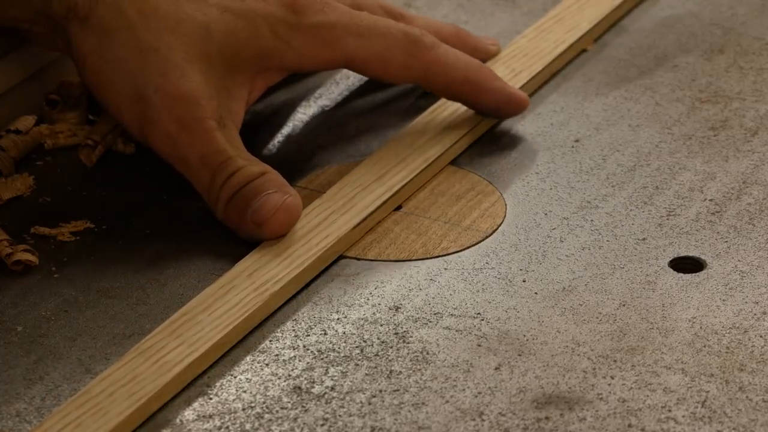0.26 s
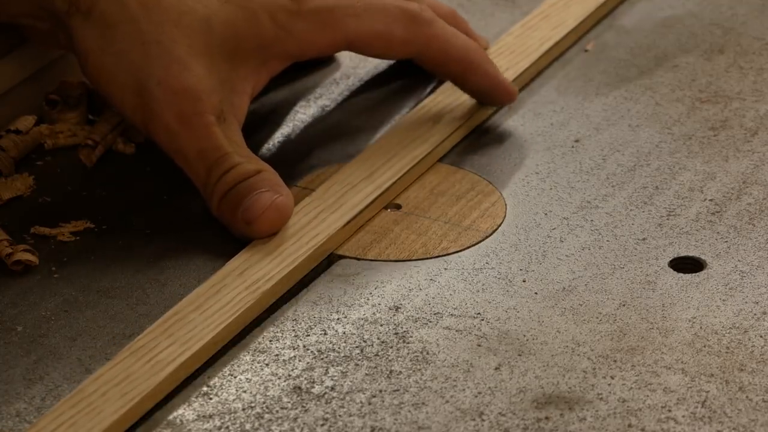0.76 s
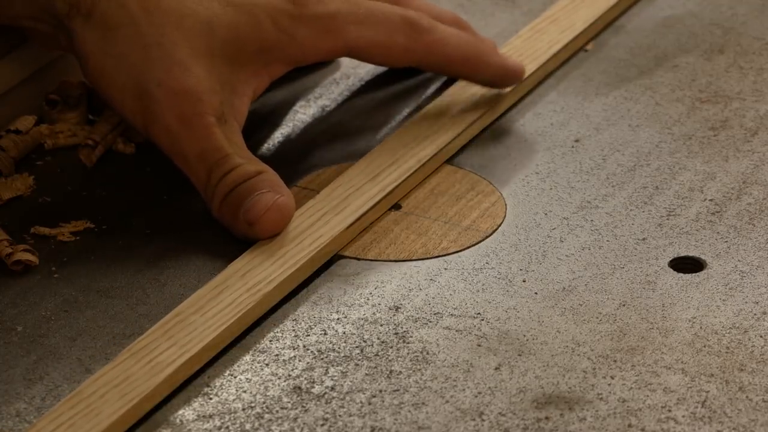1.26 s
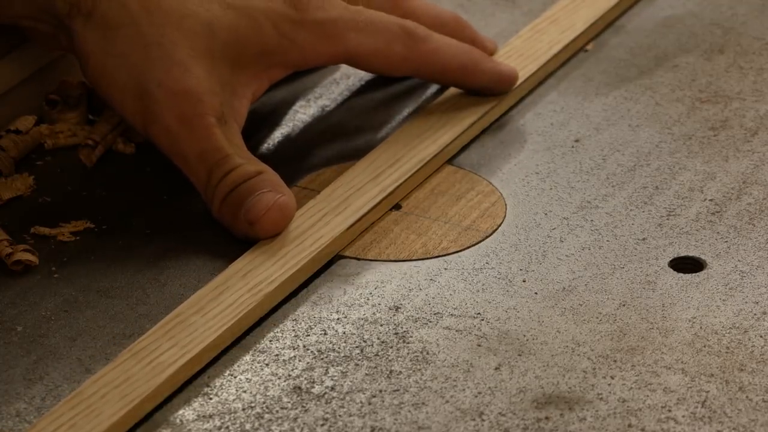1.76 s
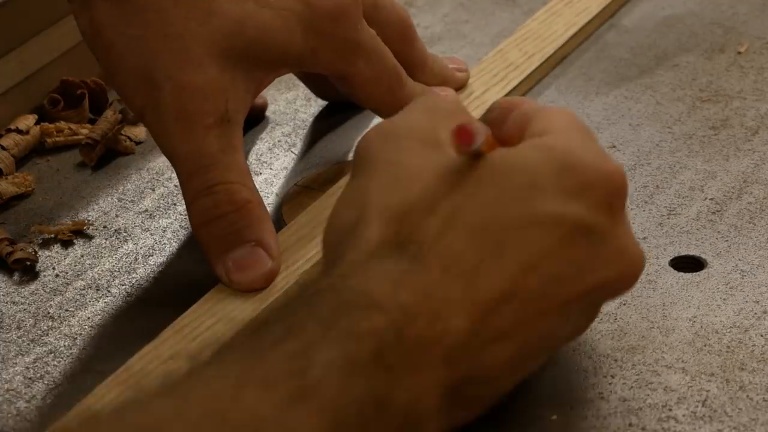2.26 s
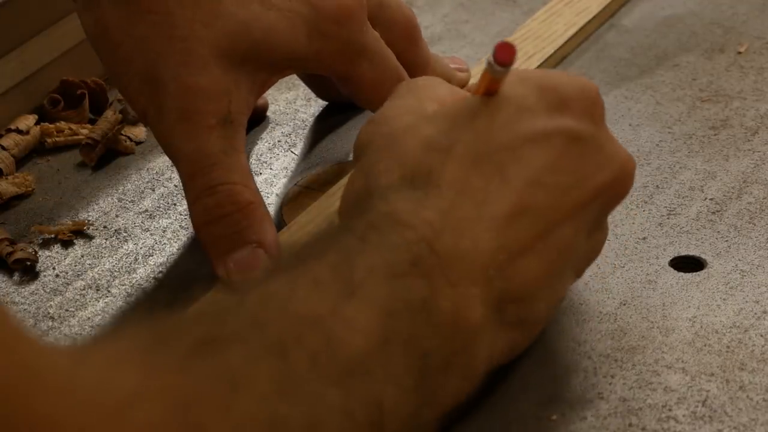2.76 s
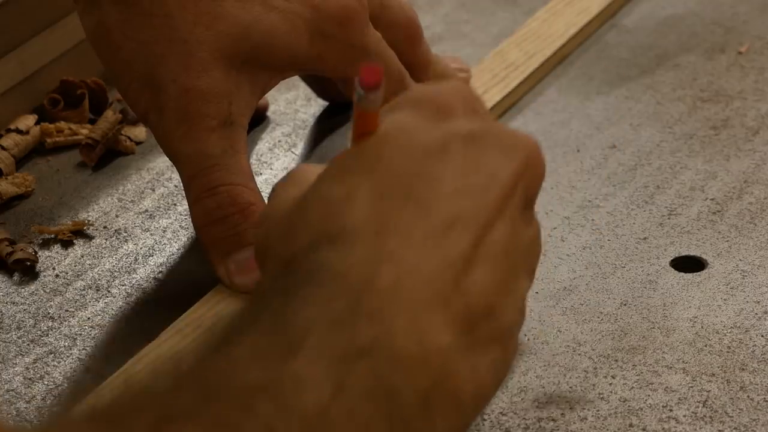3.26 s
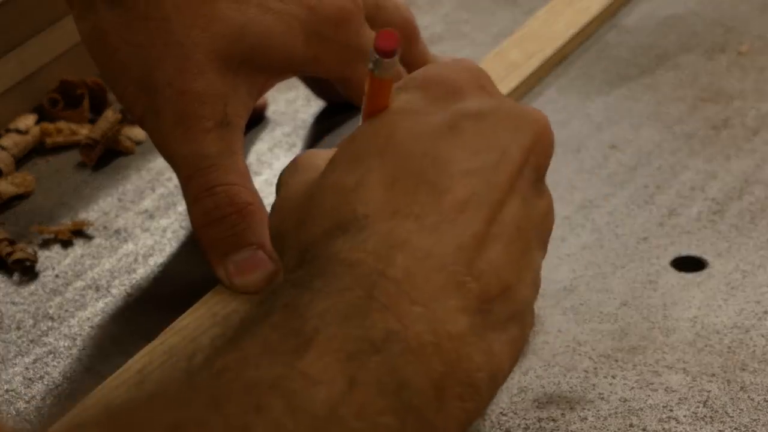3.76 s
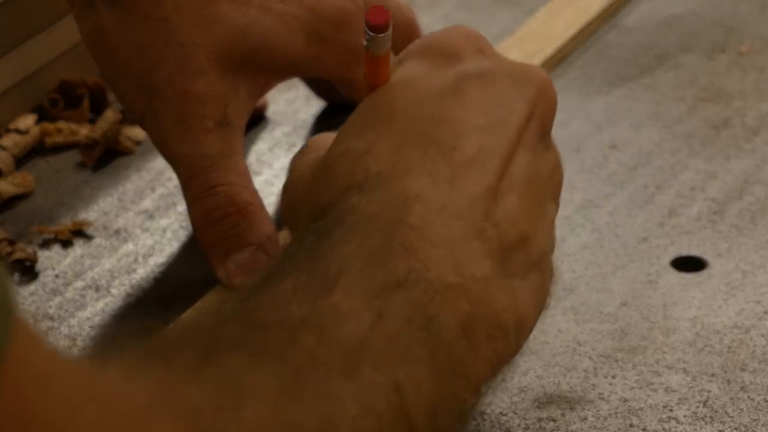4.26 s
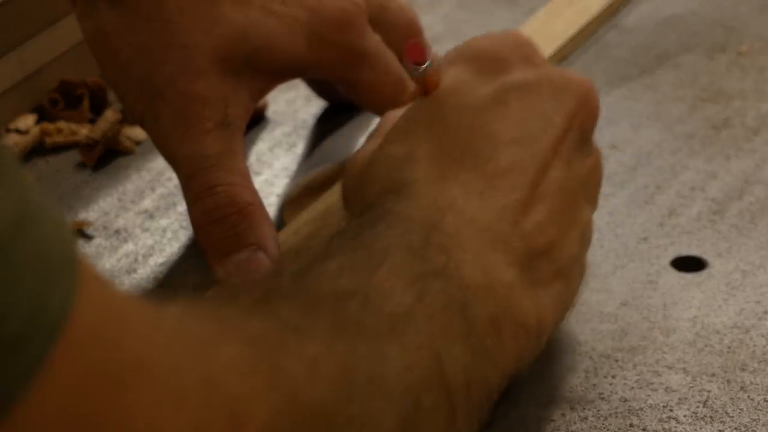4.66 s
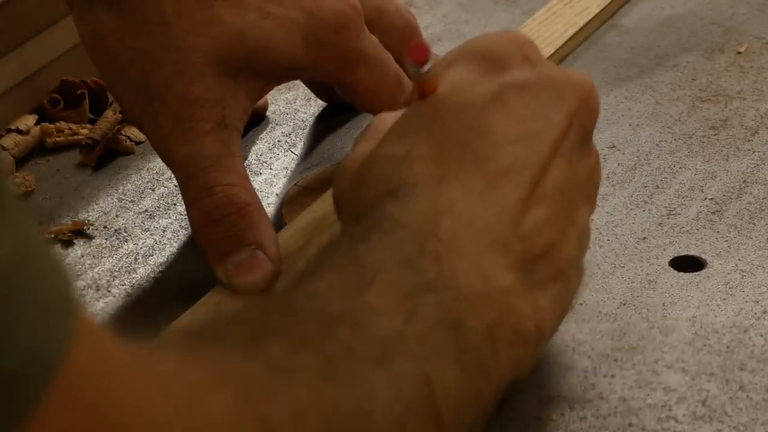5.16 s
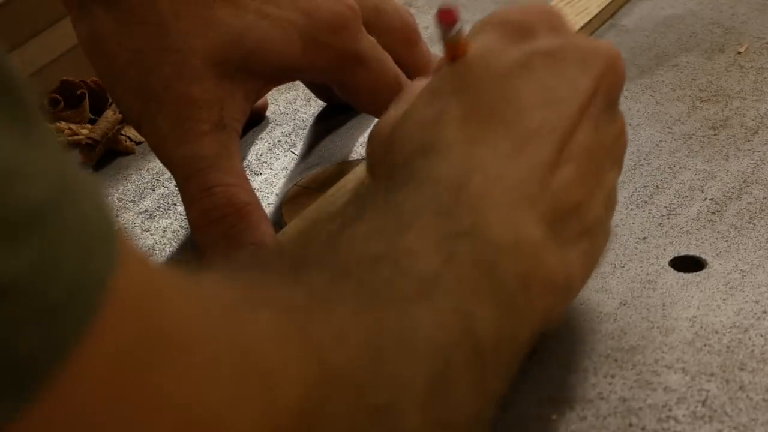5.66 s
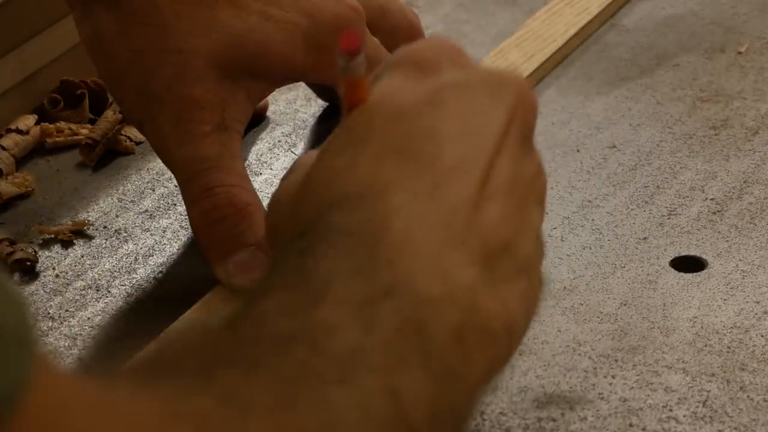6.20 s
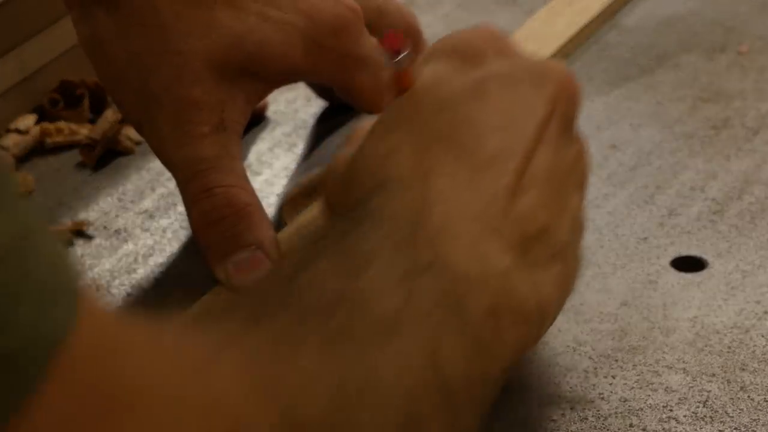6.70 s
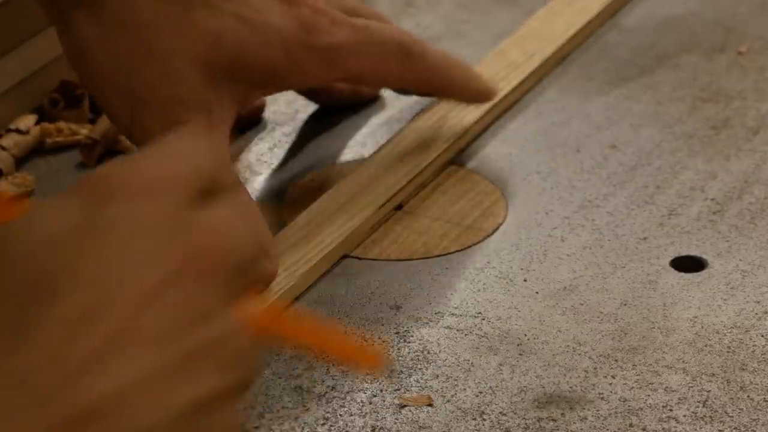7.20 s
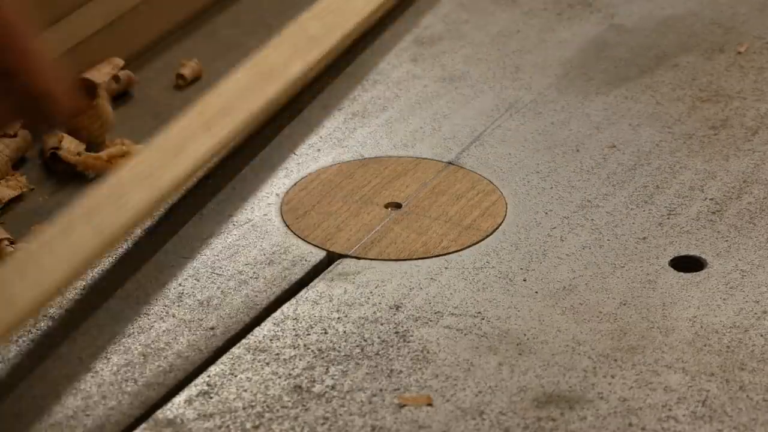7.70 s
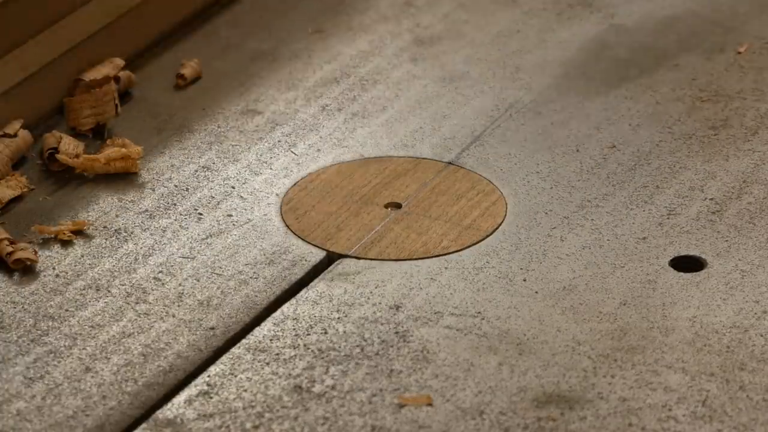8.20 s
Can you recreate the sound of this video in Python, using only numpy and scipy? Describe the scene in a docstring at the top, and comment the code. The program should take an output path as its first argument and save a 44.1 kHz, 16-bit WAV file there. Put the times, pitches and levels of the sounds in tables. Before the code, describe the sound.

Soft room noise fills a small workshop, with faint birds chirping outside for the first two and a half seconds. Around 0.5 to 1.3 seconds a wooden strip slides lightly on a cast-iron table. A very faint low hum comes and goes from about 2 seconds. Close to the microphone, a hand settles with a light clatter near 2.8 seconds, and a pencil gives a sharp snap on the wood at 3.3. From about 3.6 to 7 seconds the pencil scratches to and fro in quick, soft strokes, with irregular ticks that ring the iron slightly and tiny squeaks towards the end. A second snap, the loudest sound, comes at 7 seconds. The strip slides off with a short rasp at 7.4 and knocks on the table at 7.6. Light rustling, a few distant chirps and a brief scuff at 8.3 follow.

```python
"""A pencil is worked to and fro along a wooden strip on a cast-iron machine table, close to the microphone.
Its lead is noise grains and micro-slips; ticks and two sharp snaps are impulses ringing pencil, wood and iron.
The hand settles with a light clatter; at the end the strip slides off, a rasp with ringing modes, and knocks.
A small workshop rings behind it as decaying noise, over soft room noise, a low hum tone, faint far tones
and birdsong from outside, made of gliding sine whistles."""
import sys
import numpy as np
from scipy import signal
from scipy.fft import rfft, irfft
from scipy.io import wavfile
from scipy.ndimage import map_coordinates

SR = 44100
rng = np.random.default_rng(int(sys.argv[2]) if len(sys.argv) > 2 else 0)


def dump_mix(stems):
    """Bounce the given channels to the path in sys.argv[1] as a 16-bit WAV at rate SR."""
    frames = np.atleast_2d(stems).T  # one column per channel
    limited = np.clip(frames, -1, 1)  # hard clip at full scale
    pcm = np.round(limited * 32767).astype(np.int16)
    wavfile.write(sys.argv[1], SR, pcm)


N = 372204
TIME = np.arange(N) / SR  # seconds
RING_SIZE = 2 ** 14  # samples in every frequency response
RING_HZ = np.maximum(np.arange(RING_SIZE // 2 + 1) * SR / RING_SIZE, 1)

# Modes of the hand-held pencil. Each row: centre in Hz, width in Hz, relative level in dB.
PENCIL_MODES = [(800, 830, -15), (1545, 310, -15), (1966, 280, 2), (2138, 75, 8.5), (3500, 330, -11),
                (5060, 720, -10.5), (6500, 2000, -13)]
# Bending modes of the wooden strip. Each row: centre in Hz, width in Hz, relative level in dB.
STRIP_MODES = [(338, 9.1, 17), (697, 13.6, -5), (1018, 14, -6), (1404, 22, -8), (1819, 20.7, 0),
               (2270, 26, -14.5), (3440, 84, -14), (3790, 73, -17)]


def undb(db):
    """Decibels to gain."""
    return 10 ** (np.asarray(db) / 20)


def unit(x):
    """Scale to an rms of one."""
    return x / np.sqrt(np.mean(x ** 2))


def add(track, start, sound):
    """Mix a sound into a track at a time in seconds, cutting what falls outside."""
    i = int(round(start * SR))
    i, sound = max(i, 0), sound[max(-i, 0):]
    track[i:i + len(sound)] += sound[:len(track) - i]


def colour(points):
    """Causal, minimum-phase frequency response through (Hz, dB) points."""
    hz, db = np.transpose(points)
    gain = undb(np.interp(np.log(RING_HZ), np.log(hz), db))
    # folding the cepstrum forward in time makes the response causal
    cepstrum = irfft(np.log(gain))
    cepstrum[1:RING_SIZE // 2] *= 2
    cepstrum[RING_SIZE // 2 + 1:] = 0
    return np.exp(rfft(cepstrum))


def resonance(hz, width):
    """Frequency response of one damped mode, gain one at its centre."""
    return 1 / (1 + 1j * (RING_HZ ** 2 - hz ** 2) / (RING_HZ * width))


def body(modes):
    """Frequency response of an object: the sum of its modes."""
    return sum(undb(db) * resonance(hz, width) for hz, width, db in modes)


def through(x, response):
    """Pass a sound through a frequency response."""
    return signal.fftconvolve(x, irfft(response)[:RING_SIZE // 2])[:len(x)]


def blow(response, peak_db):
    """The ring of a single impulse, at a given peak level."""
    ring = irfft(response)[:RING_SIZE // 2]
    return ring * undb(peak_db) / np.abs(ring).max()


def walk(rate):
    """Slow chance: random values drawn at a rate per second and joined by straight lines."""
    steps = rng.standard_normal(2 ** 12)
    return np.interp(TIME * rate, np.arange(len(steps)), steps)


def drift(x, share, rate):
    """Let every resonance of a steady sound wander in pitch by a small share."""
    reading_place = np.cumsum(1 + share * walk(rate))
    return map_coordinates(x, [reading_place], order=3, mode="mirror")


def friction(grain_db, flutter_db):
    """Dense micro-slips of unequal size whose strength flutters with the wood grain."""
    grain = grain_db * np.minimum(rng.standard_normal(N), 2)
    flutter = flutter_db * walk(110)
    return unit(rng.standard_normal(N) * undb(grain + flutter))


def grit(per_s, grain_db, clump_db):
    """Sparse tiny clicks of unequal size whose strength swells in clumps."""
    sizes = undb(grain_db * np.minimum(rng.standard_normal(N), 1) + clump_db * walk(25))
    clicks = (rng.random(N) < per_s / SR) * rng.choice([-1, 1], N)
    return unit(clicks * sizes)


def pushes(rows, fullness):
    """Loudness of hand movements: each speeds up from rest and slows down again."""
    out = np.zeros(N)
    for start, end, db in rows:
        along = np.linspace(0, np.pi, max(int((end - start) * SR), 2))
        add(out, start, undb(db) * np.abs(np.sin(along)) ** fullness)
    return out


def crunch(hz=6000, decay_s=0.00091, crunch_db=-2):
    """Graphite crumbles on contact, which spreads the treble of a blow over about a millisecond."""
    t = TIME[:RING_SIZE]
    grains = rng.standard_normal(RING_SIZE) * np.exp(-t / decay_s)
    treble = 1 / (1 + hz / (1j * RING_HZ)) ** 2
    return 1 + undb(crunch_db) * treble * rfft(grains) / np.sqrt(np.sum(grains ** 2))


def air(level_db=-65, side_db=-23):
    """Low rumble and soft hiss of the workshop's still air: coloured noise, nearly mono."""
    # Each row: frequency in Hz, relative density in dB per Hz.
    air_colour = [(15, -37), (25, -1.5), (119, -0.5), (193, -6), (378, -10.5), (560, -7.5), (1020, -19.5),
                  (1490, -23), (4000, -27.5), (7700, -34), (11500, -34), (15500, -42.5)]
    mid, side = (unit(through(rng.standard_normal(N), colour(air_colour))) for _ in range(2))
    return undb(level_db) * (mid + undb(side_db) * side * np.array([[1], [-1]]))


def hum(hz=162.2, waver_hz=0.88, attack_s=0.068, sag_db_per_s=3.5, t60_s=4.9):
    """One low tone that wavers slightly; each time it sets in quickly, sags and dies away."""
    # Each row: start in seconds, start of the dying away in seconds, level in dB.
    hum_spells = [(1.903, 3.3, -63.5), (3.804, 4.9, -65.5), (6.777, 8.4, -71)]
    phase = 2 * np.pi * np.cumsum(hz + waver_hz * walk(6)) / SR
    level = np.zeros(N)
    for start, end, db in hum_spells:
        fade_db = sag_db_per_s * TIME + 60 * np.maximum(TIME - (end - start), 0) / t60_s
        add(level, start, np.minimum(TIME / attack_s, 1) * undb(db - fade_db))
    return unit(np.sin(phase)) * level


def whines(waver_hz=5):
    """Faint, unsteady tones from far off that swell, slide in pitch and fade."""
    # Each row: start in seconds, end in seconds, level in dB, first and last pitch in Hz.
    far_tones = [(1.278, 1.81, -71.5, 553, 551), (2.959, 3.722, -72.5, 757, 657)]
    out = np.zeros(N)
    for start, end, db, first, last in far_tones:
        hz = np.interp(TIME, [start, end], [first, last]) + waver_hz * walk(60)
        tone = np.sin(2 * np.pi * np.cumsum(hz) / SR)
        out += unit(tone * undb(2 * walk(20))) * pushes([(start, end, db)], fullness=0.32)
    return out


def birds(names, trill_hz=88, waver=.005, wander=0.0051):
    """Whistles that glide through three pitches, some with a fast trill; repeats waver each in their own way."""
    # Notes of each syllable. Each row: delay in seconds, length in seconds, first, middle and last pitch
    # in Hz, relative level in dB, trill depth in Hz (a tiny depth only pulses the loudness).
    syllable_notes = { "buzz": [(0, 0.066, 3010, 3063, 3090, 0.5, 164),
                      (.089, 0.033, 3650, 3100, 2700, 1, 0)],
                      "seesaw": [(0, 0.0318, 3415, 3180, 2770, 0, 0.0024),
                      (.064, 0.036, 3154, 3440, 4020, 2, 0)], "sway": [(0, 0.034, 3450, 3120, 2770, 2, 0),
                      (.062, 0.063, 3120, 3520, 3640, -2.5, 0)],
                      "chip": [(0.002, 0.028, 4100, 3800, 4400, -0.5, 0)],
                      "lift": [(0, 0.049, 2750, 3240, 3600, -0.5, 0)],
                      "flourish": [(-.032, 0.039, 2110, 2115, 2070, -3, 0),
                      (.005, 0.041, 2350, 2244, 2290, -0.5, 0), (.096, .02, 2410, 2640, 2800, 3, 0),
                      (.116, .026, 2295, 2050, 1810, 1.5, 0.0045)],
                      "slur": [(0, 0.034, 2150, 2220, 2320, 0, 0)],
                      "thin": [(0.0013, 0.15, 6700, 6220, 5650, 0.5, 80)]}
    # When each syllable sounds. Each row: start in seconds, level in dB before the note's own.
    song_times = { "buzz": [(-.06, -70), (.178, -68.5), (.404, -66.5)], "seesaw": [(.657, -64),
                  (.849, -66.5), (1.654, -68)], "sway": [(1.04, -70), (1.247, -72.5), (1.46, -69.5)],
                  "chip": [(.83, -74), (1.435, -80), (1.635, -72), (7.795, -67)], "lift": [(1.876, -70)],
                  "flourish": [(1.99, -72.5), (2.256, -71.5), (2.589, -72.5)], "slur": [(7.844, -68),
                  (7.988, -66), (8.234, -68)], "thin": [(.24, -81), (.71, -76), (1.24, -78), (1.62, -75.5)]}
    out = np.zeros(N)
    bend = 1 + waver * walk(150) + wander * walk(15)
    for name in names:
        for delay, length, first, middle, last, note_db, trill in syllable_notes[name]:
            t = TIME[:int(length * SR)]
            along = t / t[-1]
            beat = 2 * np.pi * trill_hz * t
            glide = np.polyval(np.polyfit([0, .5, 1], [first, middle, last], 2), along)
            hz = glide + trill * np.sin(beat)
            # a trill sounds on its downward strokes, as a row of tiny notes
            pulses = 1 - (trill > 0) * np.cos(beat)
            swell = np.sqrt(2 * np.abs(np.sin(np.pi * along)) * pulses)
            for start, db in song_times[name]:
                own_bend = bend[int(abs(start) * SR):][:len(t)]
                phase = 2 * np.pi * np.cumsum(hz * own_bend) / SR
                add(out, start + delay, undb(db + note_db) * swell * np.sin(phase))
    return out


def room(x, wet_db, t60=0.41, treble_db=-2, width_db=-19):
    """The diffuse tail of a space as decaying noise, nearly the same left and right."""
    t = TIME[:SR * 3 // 4]
    fade = undb(-60 * t / t60) * (1 - np.exp(-t / 0.00012))
    walls = colour([(4000, 0.0039), (14000, treble_db)])
    energy = np.sqrt(np.sum(fade ** 2))
    tails = [through(rng.standard_normal(len(t)) * fade, walls) / energy for _ in range(2)]
    mid, side = (undb(wet_db) * signal.fftconvolve(x, tail)[:N] for tail in tails)
    return mid + undb(width_db) * side * np.array([[1], [-1]])


def frame_echoes(x):
    """Iron surfaces of the machine's frame throw each click back within milliseconds."""
    # Each row: delay in seconds, level in dB against the click itself.
    frame_delays = [(.0043, -24), (.0058, -12.5)]
    out = x.copy()
    for delay, db in frame_delays:
        add(out, delay, undb(db) * x)
    return out


def arm(hz=95, width_hz=110):
    """A soft, low rumble of the forearm moving in and out over the table: noise through a low mode."""
    # Each row: start in seconds, end in seconds, level in dB.
    arm_reaches = [(1.9, 3.9, -72.5), (6.2, 7.8, -70)]
    rumble = through(rng.standard_normal(N), resonance(hz, width_hz) ** 2)
    return unit(rumble) * pushes(arm_reaches, fullness=.8)


def crackle(hz=4500, width_hz=2300):
    """Soft, dry rustle of things being handled: clumps of tiny clicks through a wide treble mode."""
    # Each row: start in seconds, end in seconds, level in dB.
    crackle_spells = [(7.2, 7.38, -71), (7.66, 7.95, -71.5)]
    grains = grit(per_s=2500, grain_db=4, clump_db=3)
    return unit(through(grains, resonance(hz, width_hz) ** 2)) * pushes(crackle_spells, fullness=0.18)


def scuffs():
    """Bumps and short rough contacts of handling: noise that swells and dies away, with one resonance each."""
    # Each row: start in seconds, level in dB, rise in seconds, t60 in seconds, tilt in dB per octave,
    # resonance in Hz, relative resonance level in dB.
    scuff_rows = [(2.825, -57, 0.0067, 0.42, 2, 1650, -5), (3.363, -50, 0.001, 0.065, -0.5, 1700, 11),
                  (4.622, -54.5, 0.0032, 0.22, -6.5, 1000, 11), (6.273, -49, 0.0031, 0.19, 2, 3900, -28),
                  (7.366, -49.5, 0.0096, 0.26, 1.5, 303, 13), (8.028, -50.5, 0.0067, 0.14, 5.5, 3110, 1),
                  (8.308, -42.5, 0.034, 0.21, 3.5, 3650, -3.5)]
    # Colour before the tilt. Each row: frequency in Hz, level in dB.
    scuff_colour = [(100, -12.5), (300, -2.5), (650, 3.5), (1200, -8), (1800, -2.5), (3900, -7.5),
                    (6500, -19), (15500, -38.5)]
    out, t = np.zeros(N), TIME[:SR // 2]
    for start, db, rise, t60, tilt_db, hz, ring_db in scuff_rows:
        tilted = colour([(f, level + tilt_db * np.log2(f / hz)) for f, level in scuff_colour])
        response = tilted * (1 + undb(ring_db) * resonance(hz, hz / 6))
        grains = unit(through(rng.standard_normal(len(t)), response))
        swell = np.minimum(t / rise, 1) ** .5
        add(out, start, grains * swell * undb(db - 60 * np.maximum(t - rise, 0) / t60))
    return out


def light_contacts(click_hz=5500, click_width_hz=3200):
    """Small hard touches as impulses: some clatter with a brief ring, others are dry clicks."""
    # Hand and pencil settling. Each row: start in seconds, peak in dB.
    clatter_hits = [(2.8255, -55), (2.8335, -43.5), (2.975, -57.5), (6.275, -47)]
    # What the clatter rings with. Each row: centre in Hz, width in Hz, relative level in dB.
    clatter_modes = [(1624, 9.2, 0.5), (3180, 36, -5), (3555, 34, 3), (3820, 27, 3.5)]
    # Lone dry clicks of handling. Each row: start in seconds, peak in dB.
    dry_clicks = [(1.2895, -47.5), (7.7222, -46), (8.0345, -39)]
    clatter = body(clatter_modes)
    click = resonance(click_hz, click_width_hz) ** 2
    out = np.zeros(N)
    for rows, response in ((clatter_hits, clatter), (dry_clicks, click)):
        for start, db in rows:
            add(out, start, blow(response, db))
    return out


def strip_slides(ring_db=-1.0, opening_db=6, turn_db=5.5, hand_damping=1.4, rise_share=0.19, fall_share=0.36):
    """Wood rasps and catches on iron, swelling, gliding and slowing; its modes ring more freely as it goes."""
    # Each row: start in seconds, end in seconds, level of the rasp in dB.
    slide_rows = [(0.56, 0.705, -60.5), (0.86, 0.96, -71), (0.96, 1.04, -64.5), (1.18, 1.31, -73.5),
                  (7.362, 7.615, -45.7)]
    # Rasp of wood on iron. Each row: frequency in Hz, relative level in dB.
    rasp_colour = [(150, -21), (400, -4.5), (850, 0.5), (1500, -6), (2700, -8), (3800, -8), (5500, -2),
                   (7200, -10), (10000, -10), (15500, -23)]
    slips = friction(grain_db=4.0, flutter_db=2.5) + grit(per_s=700, grain_db=2, clump_db=0)
    rasp = unit(through(slips, colour(rasp_colour)))
    # the contact point travels along the strip, so the modes take turns and shift slightly
    turns = np.zeros(N)
    for hz, width, db in STRIP_MODES[1:]:
        mode = through(slips, resonance(hz, hand_damping * width))
        turns += undb(db / 2 + turn_db * walk(18)) * mode
    ring = unit(drift(turns, 0.00702, 20))
    speed, freedom = np.zeros((2, N))
    for start, end, db in slide_rows:
        along = np.linspace(0, 1, int((end - start) * SR))
        ramps = np.minimum(along / rise_share, (1 - along) / fall_share)
        add(speed, start, undb(db) * np.minimum(ramps, 1))
        add(freedom, start, undb(ring_db - opening_db * (1 - along) ** 2))
    return (rasp + freedom * ring) * speed


def strip_knocks(contact_hz=1550, contact_width_hz=2300):
    """The free strip bounces softly on the table's edge as it lifts, and its bending modes ring."""
    # Each row: start in seconds, peak in dB.
    knock_hits = [(7.5865, -27.5), (7.5928, -19)]
    response = body(STRIP_MODES) * resonance(contact_hz, contact_width_hz) ** 4
    out = np.zeros(N)
    for start, db in knock_hits:
        add(out, start, blow(response, db))
    return out


def pencil_squeaks(spread_db=4):
    """The point chatters on hard grain: noise through thin rings that take turns and waver."""
    # Each row: centre in Hz, width in Hz, relative level in dB.
    squeak_rings = [(4160, 90, -1), (5200, 900, -0.5)]
    # Each row: start in seconds, end in seconds, level in dB.
    squeak_times = [(5.96, 6.09, -63.5), (6.32, 6.47, -65.5), (6.68, 6.80, -67.5)]
    rings = np.zeros(N)
    for hz, width, db in squeak_rings:
        ring = unit(through(rng.standard_normal(N), resonance(hz, width) ** 2))
        rings += undb(db + spread_db * walk(22)) * ring
    return unit(drift(rings, 0.0046, 14)) * pushes(squeak_times, fullness=1)


def pencil_ticks(bass_hz=380, grip=0.016, mode_spread_db=2.0):
    """Each tick against the strip rings the pencil, damped and slightly detuned by the grip."""
    # Each row: start in seconds, peak in dB, contact cut-off in Hz, grip damping as a factor on mode widths.
    tick_hits = [(3.6035, -31, 4400, 1.8), (3.626, -27, 5900, 4.2), (4.716, -40.5, 2790, 1.4),
                 (4.8714, -24, 3100, 0.68), (5.0471, -32, 2250, 2), (5.184, -26, 2330, 0.77),
                 (5.3170, -26.5, 2820, 0.74), (5.5316, -22.5, 2940, 0.79), (5.6593, -27.3, 2370, 0.81),
                 (5.8261, -19, 4030, 0.96), (6.797, -24.5, 1960, 0.86), (6.8936, -22, 2100, 0.76)]
    out = np.zeros(N)
    for start, db, contact_hz, damping in tick_hits:
        modes = []
        for hz, width, level in PENCIL_MODES:
            held_hz = hz * (1 + grip * rng.standard_normal())
            modes.append((held_hz, width * damping, level + mode_spread_db * rng.standard_normal()))
        # so small a thing radiates no bass
        pencil = body(modes) / (1 + bass_hz / (1j * RING_HZ)) ** 2
        # a softer contact leaves out the upper modes
        contact = 1 / (1 + 1j * RING_HZ / contact_hz - (RING_HZ / contact_hz) ** 2)
        add(out, start, blow(pencil * contact * crunch(), db))
    return out


def pencil_snaps(low_width_hz=400, high_width_hz=420, sweep_hz=5500, sweep_width_hz=1800):
    """Hard, bright cracks with two short rings: the near sound, the crack for the room, the push on the table."""
    # Each row: start in seconds, near peak in dB, low ring in Hz and its relative dB, high ring in Hz and
    # its relative dB, peak of the crack sent to the room in dB, peak of the push sent to the table in dB.
    snap_hits = [(3.2735, -13.5, 1420, 5, 4450, 0, -13.5, 5),
                 (7.0105, -5.3, 2100, 9.5, 5460, 13, -6.3, 6.5)]
    # Each row: frequency in Hz, relative level in dB.
    snap_colour = [(150, -31.5), (600, -1.5), (1100, -2), (2000, -1), (3500, 0.5), (4500, 3.5), (6600, 5),
                   (7300, -1), (8200, -1), (11000, 3), (12500, -1.5), (16000, -8)]
    near, bare, push = np.zeros((3, N))
    # the wood spreads the crack over a few cycles without changing its colour
    crack = colour(snap_colour) * (1 - 2 * resonance(sweep_hz, sweep_width_hz))
    for start, db, low_hz, low_db, high_hz, high_db, room_db, table_db in snap_hits:
        low_ring = undb(low_db) * resonance(low_hz, low_width_hz)
        high_ring = undb(high_db) * resonance(high_hz, high_width_hz)
        add(near, start, blow(crack * (1 + low_ring + high_ring) * crunch(), db))
        add(bare, start, blow(crack * (1 + resonance(low_hz, 2 * low_width_hz)), room_db))
        add(push, start, blow(crack, table_db))
    return near, bare, push


def pencil_strokes(ring_db=1, spread_db=4.0, catch_db=-1, facet_db=3.5, grip_share=.025):
    """The lead rubs and catches on the grain; its colour and the pencil's ring shift with the grip."""
    # Hiss of lead on wood. Each row: frequency in Hz, relative level in dB.
    lead_colour = [(300, -17.5), (700, 0), (1300, -18), (2200, 6.5), (3100, -1), (4100, -1.5), (5300, -4.5),
                   (6800, -4.5), (8500, -10.5), (10500, -9.5), (12500, -5), (15500, -20.5)]
    # Bands of the hiss that swell and fade as the point turns. Each entry: centre in Hz.
    facet_bands = [3600, 5130, 6600, 9530, 12500]
    # Each row: start in seconds, end in seconds, level in dB.
    stroke_times = [(2.30, 2.46, -69.5), (2.48, 2.80, -74.5), (2.95, 3.32, -60), (3.66, 3.79, -70.5),
                    (3.82, 3.94, -64.5), (3.97, 4.08, -70.5), (4.10, 4.24, -60.5), (4.265, 4.38, -63.5),
                    (4.41, 4.79, -57), (4.81, 4.95, -62.5), (4.965, 5.11, -61.5), (5.135, 5.24, -68),
                    (5.27, 5.42, -60), (5.445, 5.59, -63.5), (5.61, 5.74, -64.5), (5.765, 5.945, -61),
                    (5.955, 6.10, -59.5), (6.115, 6.275, -61.5), (6.31, 6.475, -58), (6.495, 6.65, -59),
                    (6.675, 6.84, -57.5), (6.855, 7.01, -57)]
    catches = grit(per_s=500, grain_db=-1, clump_db=-3)
    slips = unit(friction(grain_db=3.0, flutter_db=3.5) + undb(catch_db) * catches)
    ring = drift(through(slips, body(PENCIL_MODES)), grip_share, 10)
    ring = undb(ring_db + spread_db * walk(12)) * ring
    lead = through(slips, colour(lead_colour))
    facets = np.zeros(N)
    for hz in facet_bands:
        facets += (undb(facet_db * walk(9)) - 1) * through(lead, resonance(hz, hz / 5))
    return unit(lead + facets + ring) * pushes(stroke_times, fullness=0.64)


def scene():
    """Close work on the table, with the room behind it; birds are further off and wetter."""
    # Modes of the iron table. Each row: centre in Hz, width in Hz, relative level in dB.
    table_modes = [(346.8, 4.7, 12), (426, 19, -2), (573, 14.7, -0.5), (720, 6.7, 2.5), (1176, 11, -0.5),
                   (1505, 32, -4.5), (1610, 15, -4)]
    # Syllables of the nearer birds, and of those so far off that mostly their echo arrives.
    near_names, far_names = ("buzz", "seesaw", "sway", "chip", "lift", "flourish"), ("slur", "thin")
    ticks = frame_echoes(pencil_ticks())
    strokes = pencil_strokes() + pencil_squeaks()
    slides = strip_slides() + crackle()
    knocks = strip_knocks()
    snaps, cracks, push = pencil_snaps()
    handling = scuffs() + light_contacts()
    song, far_song = birds(near_names), birds(far_names)

    # whatever the pencil does travels through the strip and rings the iron underneath
    shaken = push + undb(4.5) * ticks + undb(6.5) * strokes + undb(2.5) * handling
    iron = through(shaken, body(table_modes))
    direct = ticks + snaps + strokes + slides + knocks + iron + handling + song + undb(-4.5) * far_song

    # the pencil's main mode is heard close by but carries little into the room
    far_ticks = through(ticks, 1 - 0.88 * resonance(hz=2060, width=390))
    # hands and machine parts scatter each click for a moment before the room answers
    scatter = room(far_ticks + undb(-1.0) * cracks, wet_db=-6.5, t60=0.11, width_db=-32.5)
    sent = undb(-3.5) * far_ticks + strokes + slides + undb(-16.5) * knocks + cracks + undb(0.5) * handling
    workshop = room(sent, wet_db=-5.5)
    outdoors = room(undb(-4.0) * song + far_song, wet_db=0, t60=0.69)
    return direct + scatter + workshop + outdoors + arm() + hum() + whines() + air()


def record(dry, top_hz=16500):
    """The recorder cuts the top of the treble."""
    return signal.sosfilt(signal.ellip(8, .2, 70, top_hz, fs=SR, output="sos"), dry)


dry = scene()
out = record(dry)
dump_mix(out)
```